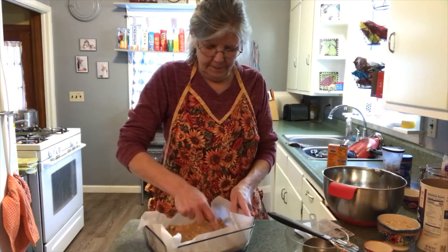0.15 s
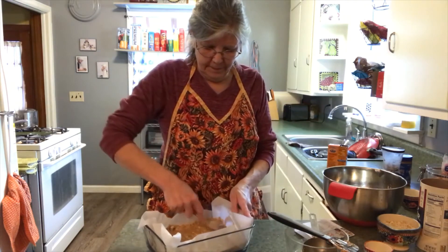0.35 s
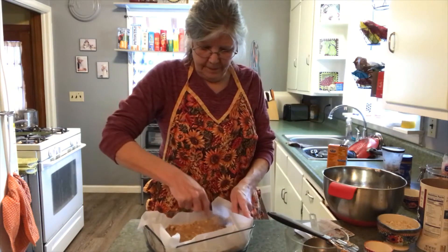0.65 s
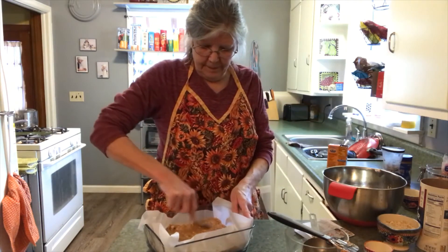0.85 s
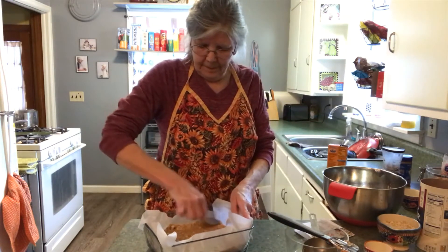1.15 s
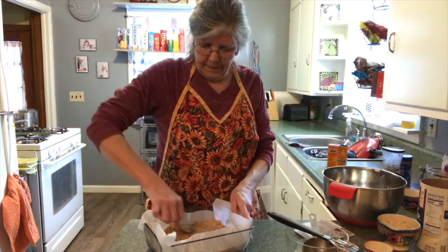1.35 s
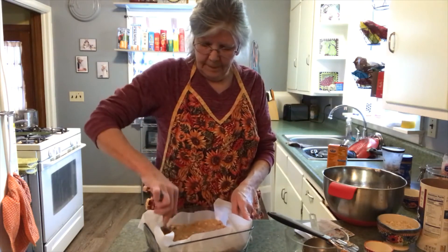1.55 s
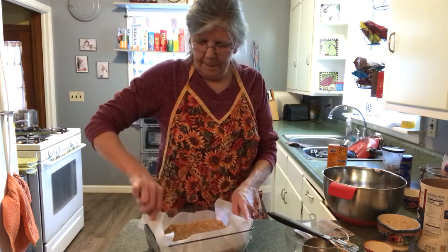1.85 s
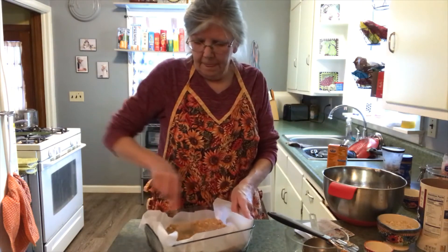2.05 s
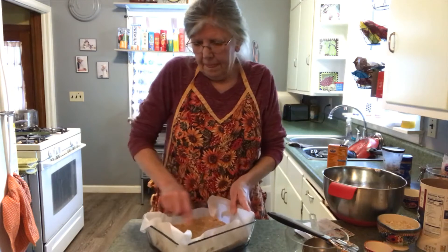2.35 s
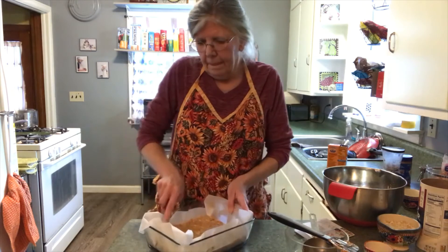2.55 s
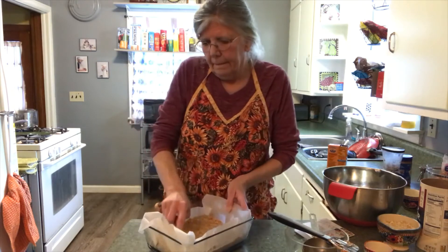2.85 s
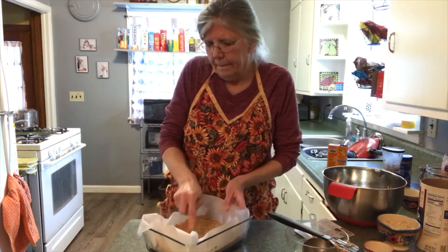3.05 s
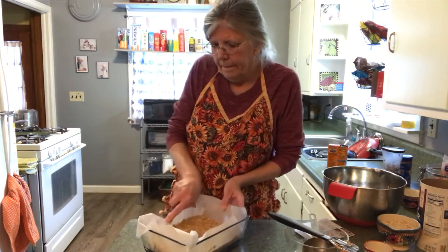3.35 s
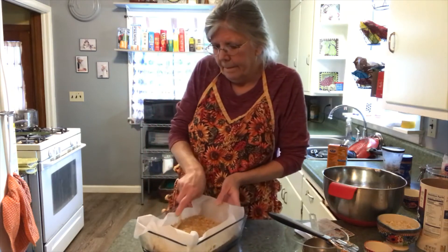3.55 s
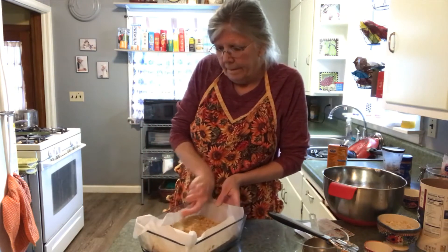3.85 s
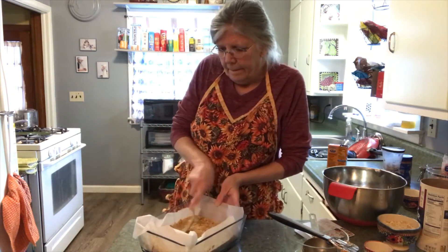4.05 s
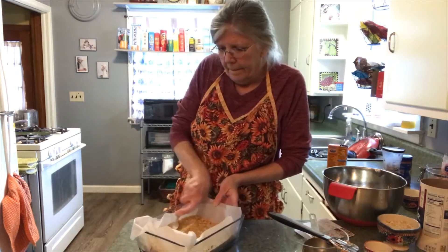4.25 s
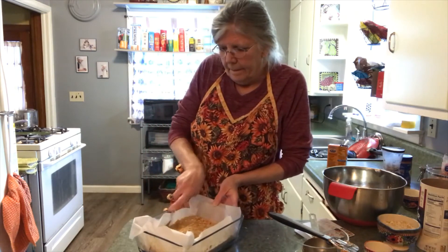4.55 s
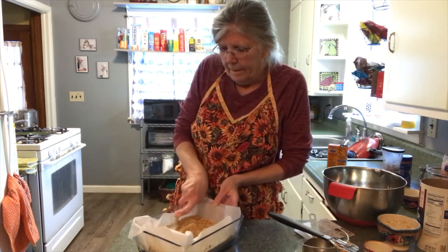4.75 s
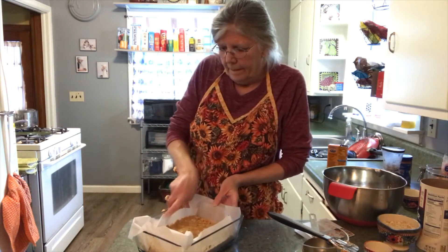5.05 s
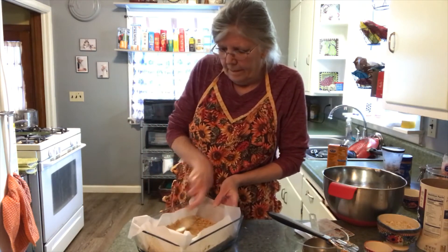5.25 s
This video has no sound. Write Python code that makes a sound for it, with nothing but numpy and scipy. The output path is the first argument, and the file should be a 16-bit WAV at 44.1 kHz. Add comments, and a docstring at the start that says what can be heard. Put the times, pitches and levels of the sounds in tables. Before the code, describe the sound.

Hands press a crumbly mix into a glass pan lined with parchment. The pan clinks and scrapes briefly on the counter at the start, then irregular crisp paper snaps and crinkles continue, with soft finger pats becoming more regular. A heavy low thump lands on the counter late. Close single microphone in a small, quiet kitchen with short reverberation.

```python
"""A kitchen counter, one microphone: hands press a crumbly mix into a glass pan lined with parchment.
The paper creases in noise-burst snaps and dense crinkles; the mix crunches in clumped noise grains.
Fingers pat it in dull puffs, and the pan clinks a few times in decaying sine modes and briefly scrapes.
Pan knocks and pushes thump the counter, one of them heavily; noise tails give the kitchen's answer
over a low room tone with a faint wavering hum."""
import sys
import numpy as np
from scipy import signal
from scipy.fft import rfft, irfft, next_fast_len
from scipy.io import wavfile
from scipy.ndimage import map_coordinates

SR = 44100
rng = np.random.default_rng(int(sys.argv[2]) if len(sys.argv) > 2 else 0)


def to_wav(s):
    """Save 16-bit WAV."""
    ch = np.atleast_2d(s).T  # columns
    pcm = np.round(np.clip(ch, -1, 1) * 32767)  # PCM
    wavfile.write(sys.argv[1], SR, pcm.astype(np.int16))


N = 238933  # length in samples

# All levels in the tables are relative: each source sets its own gain on top.
# Room tone spectrum: pitch_hz, level_db (per Hz)
ROOM_TONE_SPECTRUM = [(20, 4), (35, 2), (75, -8), (120, -7.5), (250, -8), (600, -16.5), (1200, -16.5),
                      (3000, -19), (8000, -49), (16000, -62.5)]
# Decay of the kitchen: pitch_hz, t60_s
KITCHEN_DECAY = [(100, 0.61), (500, 0.32), (1500, 0.32), (4000, 0.3), (8000, 0.21), (15000, 0.16)]
# Low thumps of the counter, from pan knocks and pushes: start_s, ring_db, thud_db
COUNTER_THUMPS = [(0.040, -54.5, -55), (0.429, -58, -51), (0.565, -54, -49), (0.62, -51, -48.5),
                  (1.001, -55, -45), (2.688, -51, -47.5), (2.725, -53, -51), (4.196, -42.5, -53),
                  (4.2295, -30.5, -37.5), (4.281, -43, -38)]
# Ringing modes of the worktop and cabinet: pitch_hz, level_db, t60_s
COUNTER_MODES = [(75, -2, .25), (151, 6.5, .21), (207, -4, .14), (285, -8, .1), (395, -4, .11),
                 (610, -9, .06), (740, 1, .06), (900, 3, .045), (1130, -8, .04), (1290, -3, .04),
                 (1510, -2, .04), (2050, -12, .035)]
# Dull thud of a counter thump: pitch_hz, level_db (per Hz)
COUNTER_THUD_SPECTRUM = [(40, -14), (100, -4), (220, -1), (420, 1), (700, -11.5), (1500, -32), (5000, -53)]
# Knocks of the pan on the counter: start_s, level_db, contact_cutoff_hz, rim_modes_db, top_modes_db, crack_db
PAN_KNOCKS = [(0.039, -13.5, 7950, 1, -2, -1), (0.5591, -12.5, 2700, 1.5, -6.5, -3),
              (0.5898, -14, 3100, -4, -3, -9.5), (0.9981, -27.5, 3930, 6.5, -15, -7)]
# Ringing modes of the glass pan: pitch_hz, level_db, t60_s
PAN_MODES = [(549, -14, .07), (1110, -17, .07), (1390, -12, .06), (1490, -3, .06), (1590, -11, .06),
             (2003, -7, .085), (2080, -16, .06), (2435, 1, .075), (2975, -7, .06), (3450, -7, .02),
             (3750, -2, .045), (4200, -6, .03), (4510, -2, .045), (5120, -16, .06), (5540, -17, .08),
             (8005, -10, .08)]
# Hard contact of glass and worktop: pitch_hz, level_db (per Hz)
CONTACT_SPECTRUM = [(40, -30), (200, -14), (700, -10), (1400, -1), (4300, 1), (5200, -8), (16000, -7)]
# Dull body of a knock, as the pan's weight lands: pitch_hz, level_db (per Hz)
PAN_THUD_SPECTRUM = [(60, -23), (200, -8.5), (330, 0), (500, 5), (750, -4), (1500, -28.5), (6000, -52)]
# Level curve of the pan sliding on the counter: time_s, level_db
PAN_SLIDE = [(0.09, -100), (0.151, -39), (0.20, -41.5), (0.26, -52.5), (0.36, -100)]
# Scrape of the sliding pan: pitch_hz, level_db (per Hz)
SCRAPE_SPECTRUM = [(300, -19), (900, -7.5), (1350, 2.5), (1650, -7), (2100, -5.5), (4000, -24.5)]
# Fingers pat and rub the mix: start_s, level_db, hollow_hz (resonance under the hand)
FINGER_PATS = [(0.238, -35, 680), (0.452, -50, 851), (1.544, -39.5, 990), (2.122, -40.5, 1247),
               (2.274, -36, 910), (2.32, -35, 860), (2.68, -45, 1000), (2.857, -41, 920), (2.989, -42, 760),
               (3.104, -39, 858), (3.319, -34, 680), (3.439, -35, 675), (3.536, -35.5, 630),
               (3.69, -33.5, 645), (3.795, -38.5, 660), (3.897, -31.5, 760), (4.045, -38.5, 730),
               (4.162, -31, 700), (4.45, -41, 845), (4.606, -36, 562), (4.677, -41.5, 700),
               (4.973, -39.5, 700), (5.13, -35, 734), (5.16, -39, 940)]
# Crunch of the crumbs: pitch_hz, level_db (per Hz)
CRUMB_SPECTRUM = [(30, -23), (160, -13.5), (330, -7), (620, -2.5), (900, -0.5), (1300, -4), (2000, -21),
                  (4000, -31.5)]
# Hands press the mix into the paper: start_s, length_s, paper_crinkle_db, crumb_crunch_db
HAND_PRESSES = [(0.037, 0.09, -42.5, -56), (0.206, 0.07, -43, -52), (0.573, 0.16, -61, -59),
                (0.996, 0.15, -48, -61), (1.48, 0.06, -57.5, -67), (1.689, 0.10, -46, -44),
                (1.806, 0.10, -48, -52), (2, 0.2, -68, -59.5), (2.243, 0.11, -49, -51),
                (2.422, 0.15, -63.5, -67), (2.679, 0.16, -52, -81), (3.17, 0.19, -48, -58),
                (3.64, 0.05, -62, -52), (3.697, 0.16, -49, -50.5), (4.123, 0.17, -64.5, -50.5),
                (4.577, 0.14, -66, -57), (5.087, 0.11, -54.5, -58), (5.32, 0.09, -58.5, -74)]
# Fine crinkle of the paper: pitch_hz, level_db (per Hz)
CRINKLE_SPECTRUM = [(200, -25.5), (700, 2), (1500, -4.5), (2500, -2), (3700, 1.5), (4900, -2.5),
                    (6400, -0.5), (8500, -9), (10300, -11.5), (12000, -10.5), (16000, -15.5)]
# Dense bursts of fine crackle, runs of tiny creases or the bright edge of a pan knock:
# start_s, length_s, level_db
CRACKLE_BURSTS = [(0.034, 0.0053, -36), (0.546, 0.12, -42.5), (0.979, 0.028, -29), (1.745, 0.027, -34.5),
                  (1.834, 0.031, -43.5), (2.714, 0.031, -41), (3.524, 0.029, -38.5), (3.695, 0.034, -36),
                  (4.156, 0.023, -40), (4.603, 0.034, -48.5)]
# Loud creases that snap: start_s, level_db, treble_db (weighted by pitch in paper_snaps)
LOUD_SNAPS = [(0.1157, -32, -15), (0.26, -27.5, -22), (0.376, -33, -22), (0.6185, -24, -33),
              (0.6762, -25, -20), (0.7321, -27.5, -7), (0.8245, -33, -22), (0.9272, -27, -8),
              (0.9795, -23, -25), (0.9911, -12.5, -4.5), (0.9984, -15.5, 2.5), (1.099, -25.5, -2.5),
              (1.1697, -33.5, -42), (1.1914, -34, -22), (1.2151, -30, -9), (1.3391, -31.5, -26),
              (1.458, -30.5, -8), (1.6758, -24.5, -25), (1.694, -23, -22), (1.7531, -34, -3.5),
              (1.7752, -22, 6), (1.8128, -34, -9.5), (1.8872, -26, 1), (1.9044, -29.5, -3),
              (1.9653, -26, -16), (1.9983, -27.5, -11.5), (2.1205, -15, -6), (2.2553, -28.5, -16),
              (2.274, -25, -30.5), (2.3205, -26, -44), (2.3484, -23, -7.5), (2.373, -28.5, -15),
              (2.5112, -29.5, -18), (2.5714, -30.5, -17), (2.677, -27, -5), (2.7168, -21, -8),
              (2.7873, -28, -34), (2.9905, -28, -16), (3.0065, -27, -24), (3.1044, -23, -24),
              (3.1762, -23, -31), (3.2893, -24, -9), (3.3264, -20.5, -15.5), (3.4372, -26, -22),
              (3.4565, -25, -7.5), (3.5383, -16, -5.5), (3.6923, -22, -11), (3.7134, -20.5, -7),
              (3.7772, -26, -3), (3.8949, -20.5, -11), (3.9828, -38.5, -18), (4.0452, -26, -21.5),
              (4.1671, -23.5, -7), (4.2091, -23.5, -10), (4.3036, -30, -30), (4.4514, -25, -5),
              (4.6106, -24, -15), (4.6785, -27, -17), (4.985, -26.5, -19), (5.1314, -25.5, -14),
              (5.1846, -29, -10), (5.248, -26.5, -17), (5.2979, -28, -30), (5.345, -30, -11),
              (5.375, -27, -11)]
# Bright crack of a crease: pitch_hz, level_db (per Hz)
CRACK_SPECTRUM = [(200, -34.5), (700, -10), (1500, -8.5), (2500, -6.5), (3700, -2.5), (4900, -7), (6400, 0),
                  (8500, -3.5), (10300, -5.5), (12000, -2.5), (16000, -8.5)]
# Flap of the sheet around a crease: pitch_hz, level_db (per Hz)
FLAP_SPECTRUM = [(100, -11), (350, -2.5), (650, 11.5), (950, 4.5), (1400, -1.5), (2500, -26), (6000, -27)]

TOP_HZ = 16100  # band limit of the recorder
PAN_THUD_DB = -3.5  # relative to the knock
CLUMP_DB, CLUMPS_PER_S = 1, 25  # the mix gives way unevenly
PRESS_ATTACK_S, PRESS_RELEASE_T60_S = 0.019, 0.2  # the hand bears down quickly and eases off
REST_PAPER_DB, REST_CRUMB_DB = -71.5, -62.5  # the other hand keeps hold of the lining
FLAP_DB = -16.5  # relative to the crack
# Small creases snap by chance, more often and louder under pressure.
SMALL_SNAP_DB, SMALL_SNAP_SPREAD_DB, SMALL_SNAP_TREBLE_DB = -22.5, 5.5, -18.5
SMALL_SNAP_GROWTH = .7  # dB of snap, and of its likelihood, for each dB of crinkle


def amp(db):
    """Amplitude factor for a level in dB."""
    return 10 ** (np.asarray(db) / 20)


def unit(x):
    """Scale to rms 1."""
    return x / np.sqrt(np.mean(x ** 2) + 1e-20)


def along(points, hz):
    """Interpolate (Hz, value) points on a log frequency axis."""
    point_hz, value = np.transpose(points)
    return np.interp(np.log(hz + 1), np.log(point_hz + 1), value)


def curves(rows):
    """One value per sample for each column after the time."""
    time_s, *columns = np.transpose(rows)
    return [np.interp(np.arange(N) / SR, time_s, column) for column in columns]


def fade(t, t60):
    """Exponential decay by 60 dB in t60 seconds."""
    return np.exp(-np.log(1000) * t / t60)


def add(track, start_s, sound):
    """Mix a sound into the track at start_s."""
    start = max(round(start_s * SR), 0)
    part = track[start:start + len(sound)]
    part += sound[:len(part)]


def colour(x, spectrum, size=4096):
    """Causal minimum-phase filter of energy 1 with the given spectrum."""
    log_gain = np.log(amp(along(spectrum, np.fft.rfftfreq(size, 1 / SR))))
    # folding the cepstrum onto positive times makes the filter causal
    cepstrum = irfft(log_gain)
    cepstrum[1:size // 2] *= 2
    cepstrum[size // 2 + 1:] = 0
    response = irfft(np.exp(rfft(cepstrum)))
    return signal.fftconvolve(x, response / np.linalg.norm(response))[:len(x)]


def wobble(rate):
    """A smooth random curve, rate knots a second."""
    knots = rng.standard_normal(int(N * rate / SR) + 4)
    return map_coordinates(knots, [np.arange(N) * rate / SR])


def grains(rate, spread_db, t60):
    """Tiny noise bursts, rate a second on average, at random times and sizes, rms 1."""
    chance, size, noise = rng.random(N), rng.standard_normal(N), rng.standard_normal(N)
    power = (chance < rate / SR) * amp(spread_db * np.clip(size, -2, 2)) ** 2
    power_decay = fade(np.arange(SR // 20) / SR, t60) ** 2
    envelope = np.sqrt(np.abs(signal.fftconvolve(power, power_decay)[:N]))
    return unit(noise * envelope)


def ring(modes, t, scatter_db):
    """One decaying sine for each mode, at slightly new strengths and random phases."""
    hz, db, t60 = np.transpose(modes)[:, :, None]
    strength = amp(db + scatter_db * rng.standard_normal(hz.shape))
    return strength * fade(t, t60) * np.sin(2 * np.pi * (hz * t + rng.random(hz.shape)))


def burst(t, t60, after_db, after_t60, rise=.0005):
    """A sharp noise crack and the weaker shiver that follows it, energy 1."""
    x = rng.standard_normal(len(t)) * (fade(t, t60) + amp(after_db) * fade(t, after_t60))
    x *= 1 - np.exp(-(t / rise) ** 2)
    return x / np.linalg.norm(x)


def room_tone():
    """Low steady background of coloured noise with a faint wavering hum."""
    waver = amp(1.5 * wobble(3.5))
    air = amp(-64) * waver * colour(rng.standard_normal(N), ROOM_TONE_SPECTRUM)
    hum_hz = 77.0
    # a random phase makes the pitch waver
    hum = np.sin(2 * np.pi * hum_hz * np.arange(N) / SR + 2.3 * wobble(7.4))
    return air + amp(-71.5 + 4.3 * wobble(3.19)) * hum


def kitchen(x, count=27):
    """Diffuse answer of the room, a little different for each stretch as the hands move."""
    out = np.zeros(N)
    for index in np.array_split(np.arange(N), count):
        hz, t, bins = signal.stft(rng.standard_normal(SR * 2 // 3), SR, nperseg=256)
        # each frequency dies away at its own pace
        decay = fade(t, along(KITCHEN_DECAY, hz)[:, None])
        tail = signal.istft(bins * decay, SR, nperseg=256)[1]
        # reflections thicken as the sound reaches the walls
        tail *= 1 - np.exp(-np.arange(len(tail)) / SR / .008)
        answer = signal.fftconvolve(x[index], tail / np.linalg.norm(tail))
        add(out, index[0] / SR, answer)
    return out


def counter():
    """Pan knocks and pushes set the worktop and its cabinet booming in decaying modes."""
    out, t = np.zeros(N), np.arange(SR // 2) / SR
    hz = np.transpose(COUNTER_MODES)[0][:, None]
    # the low modes of the cabinet take longer to build up
    swell = 1 - np.exp(-t / (0.03 * (150 / hz) ** 2))
    for start_s, ring_db, thud_db in COUNTER_THUMPS:
        boom = (ring(COUNTER_MODES, t, scatter_db=0.6) * swell).sum(axis=0)
        knock = colour(rng.standard_normal(len(t)) * fade(t, t60=0.083), CRUMB_SPECTRUM)
        thud = colour(rng.standard_normal(len(t)) * fade(t, t60=0.13), COUNTER_THUD_SPECTRUM)
        add(out, start_s, amp(ring_db) * (boom + amp(2.5) * knock) + amp(thud_db) * thud)
    return out


def pan_knocks():
    """The pan clinks on the counter in glass modes, brighter for a harder contact, over a dull thud."""
    out, t = np.zeros(N), np.arange(SR // 3) / SR
    hz = np.transpose(PAN_MODES)[0]
    for start_s, db, contact_hz, rim_db, top_db, crack_db in PAN_KNOCKS:
        # the point of contact sets the shares of the low rim modes and of the top modes
        shares = amp(rim_db * (hz < 1800) + top_db * (hz > 3300))
        clink = shares @ ring(PAN_MODES, t, scatter_db=1)
        crack = burst(t, t60=0.0068, after_db=-11.5, after_t60=0.0097, rise=0.00028)
        crack = colour(crack, CONTACT_SPECTRUM)
        # a softer contact leaves the treble out; the low cut keeps the clink clear of the thud
        band_hz = [650, min(contact_hz, SR / 3)]
        passband = signal.butter(2, band_hz, "bandpass", fs=SR, output="sos")
        hit = signal.sosfilt(passband, clink + amp(crack_db + 22.5) * crack)
        add(out, start_s, amp(db - 3.0) * hit)
        thud = colour(burst(t, t60=0.012, after_db=-13, after_t60=0.068), PAN_THUD_SPECTRUM)
        add(out, start_s, amp(db + PAN_THUD_DB) * thud)
    return out


def pan_slide():
    """The pan slides a little on the counter: a scrape of coloured noise grains."""
    slide_db, = curves(PAN_SLIDE)
    # silent at the resting level of the curve's two ends
    sliding = slide_db > np.transpose(PAN_SLIDE)[1][[0, -1]].max()
    scrape = colour(grains(rate=360, spread_db=0, t60=0.027), SCRAPE_SPECTRUM)
    return sliding * amp(slide_db) * scrape


def pats():
    """Soft fingertips land on the mix: a dull puff, coloured by the hollow under the hand."""
    out, t = np.zeros(N), np.arange(SR // 8) / SR
    hz = np.geomspace(30, 16000, 110)
    for start_s, db, hollow_hz in FINGER_PATS:
        puff = rng.standard_normal(len(t)) * fade(t, t60=0.054) * (1 - np.exp(-t / 0.0023))
        # a 9 dB peak, its half-width in octaves
        hollow = 9 / (1 + (np.log2(hz / hollow_hz) / 0.23) ** 2)
        spectrum = np.column_stack([hz, along(CRUMB_SPECTRUM, hz) + hollow])
        add(out, start_s, amp(db) * colour(puff, spectrum))
    return out


def pressure():
    """Strength of the paper's crinkle and the crumbs' crunch: each press rises, holds and lets go."""
    paper, crumb = np.full(N, amp(REST_PAPER_DB)), np.full(N, amp(REST_CRUMB_DB))
    t = np.arange(SR) / SR
    for start_s, length_s, paper_db, crumb_db in HAND_PRESSES:
        attack = np.minimum(t / PRESS_ATTACK_S, 1)
        shape = attack * fade(np.maximum(t - length_s, 0), PRESS_RELEASE_T60_S)
        add(paper, start_s, amp(paper_db) * shape)
        add(crumb, start_s, amp(crumb_db) * shape)
    return paper, crumb


def rustle(paper, crumb):
    """Fine creases crackle and crumbs grind in uneven clumps while the hands move."""
    creases = grains(rate=850, spread_db=5.2, t60=.008)
    crumbs = grains(rate=450, spread_db=4, t60=.018)
    clumps = amp(CLUMP_DB * wobble(CLUMPS_PER_S))
    crinkle = amp(-2.5) * paper * colour(creases, CRINKLE_SPECTRUM)
    crunch = amp(-6.5) * crumb * clumps * colour(crumbs, CRUMB_SPECTRUM)
    return crinkle + crunch


def crackle_bursts():
    """Dense fine crackle, its grains too fast to tell apart: tiny creases or a knock's bright edge."""
    strength = np.zeros(N)
    for start_s, length_s, db in CRACKLE_BURSTS:
        window = signal.windows.tukey(max(round(length_s * SR), 8), .5)
        add(strength, start_s, amp(db) * window)
    return strength * colour(grains(rate=2000, spread_db=7.0, t60=0.0089), CRINKLE_SPECTRUM)


def small_snaps(paper, count=34):
    """Rows like LOUD_SNAPS for the lesser creases, scattered where the paper is under strain."""
    strain = (paper / paper.max()) ** SMALL_SNAP_GROWTH
    # equal shares of the summed strain crowd the snaps into the presses
    share = (np.arange(count) + rng.random(count)) / count
    at = np.minimum(np.searchsorted(np.cumsum(strain) / strain.sum(), share), N - 1)
    scatter_db = SMALL_SNAP_SPREAD_DB * rng.standard_normal(count)
    db = SMALL_SNAP_DB + 20 * np.log10(strain[at]) + scatter_db
    return [(start_s, level, SMALL_SNAP_TREBLE_DB) for start_s, level in zip(at / SR, db)]


def paper_snaps(snaps):
    """A crease buckles with a bright crack, and the sheet around it flaps."""
    out, t = np.zeros(N), np.arange(SR // 16) / SR
    hz = np.geomspace(200, 16000, 20)
    for start_s, db, treble_db in snaps:
        # sharper creases put more into the top octave
        tilt = along([(5000, 0.042), (12000, 0.61)], hz) * treble_db
        crack = burst(t, t60=.009, after_db=-17, after_t60=.028, rise=.0008)
        crack = colour(crack, np.column_stack([hz, along(CRACK_SPECTRUM, hz) + tilt]))
        flap = burst(t, t60=0.016, after_db=-15.5, after_t60=0.019, rise=0.0016)
        flap = colour(flap, FLAP_SPECTRUM)
        add(out, start_s, amp(db + 10.5) * (crack + amp(FLAP_DB) * flap))
    return out


def scene(walls=2):
    """Direct sound of paper, mix, pan and counter, the kitchen's answer and the room tone."""
    paper, crumb = pressure()
    snaps = list(LOUD_SNAPS) + small_snaps(paper)
    hands = rustle(paper, crumb) + crackle_bursts() + pats()
    clinks = pan_knocks() + pan_slide()
    thumps = counter()
    wet = kitchen(amp(-9.0) * hands + amp(-13.5) * clinks + amp(-11.0) * thumps)
    # the sheet sends a different crack towards each wall
    snap_answer = sum(kitchen(paper_snaps(snaps)) for wall in range(walls))
    wet += amp(-7.0) * snap_answer / np.sqrt(walls)
    return (paper_snaps(snaps) + hands + clinks + thumps + wet + room_tone())[None]


def record(dry):
    """The recorder cuts the deepest rumble and keeps nothing above its band limit."""
    low_cut = signal.butter(6, 34, "highpass", fs=SR, output="sos")
    x = signal.sosfilt(low_cut, dry)
    size = next_fast_len(N + SR // 2)
    kept = np.fft.rfftfreq(size, 1 / SR) < TOP_HZ
    return irfft(rfft(x, size) * kept, size)[:, :N]


dry = scene()
out = record(dry)
to_wav(out)
```